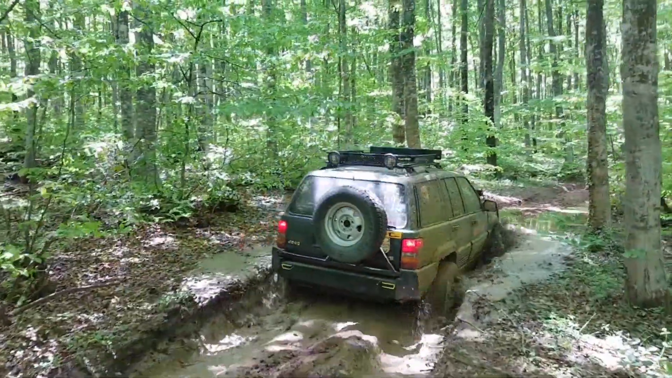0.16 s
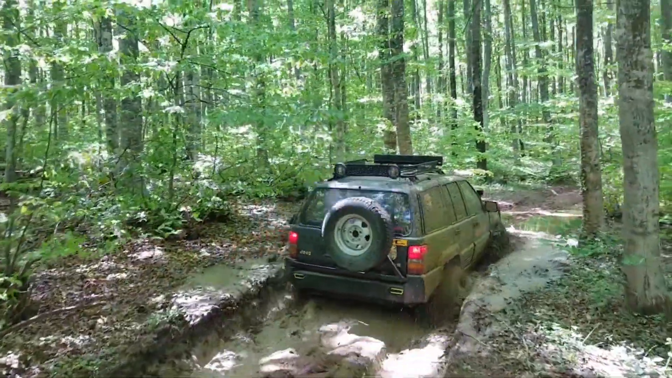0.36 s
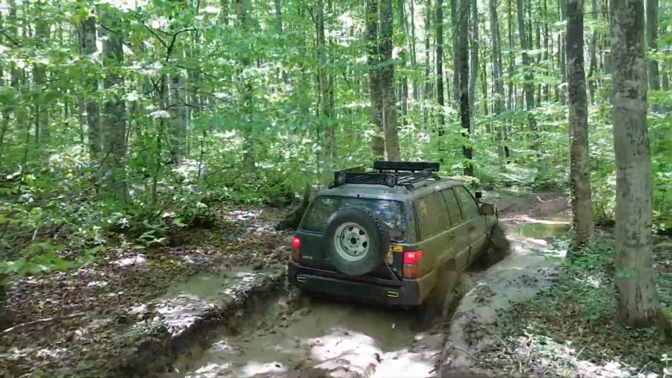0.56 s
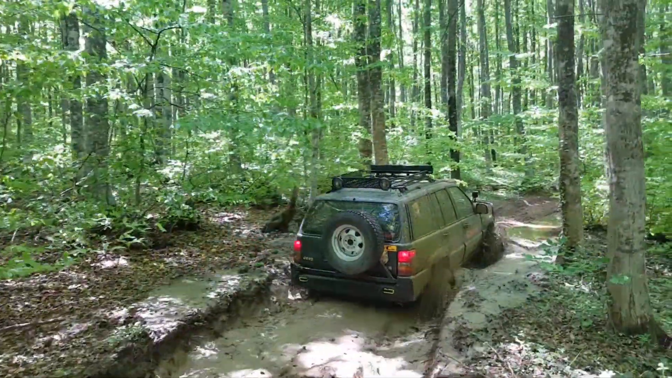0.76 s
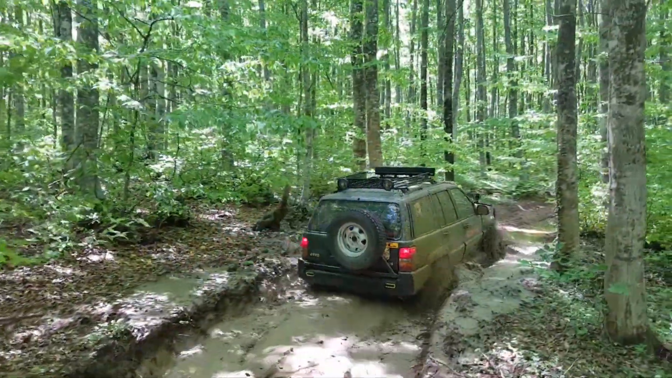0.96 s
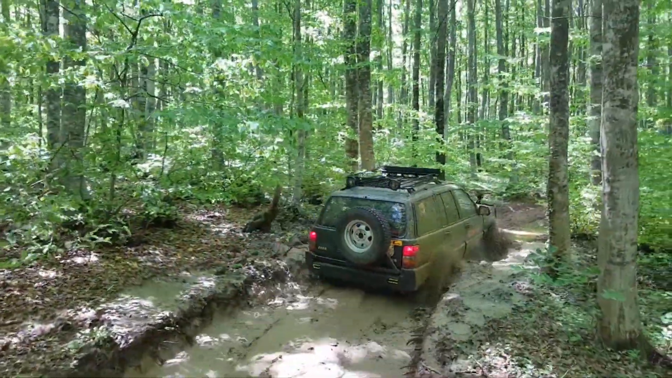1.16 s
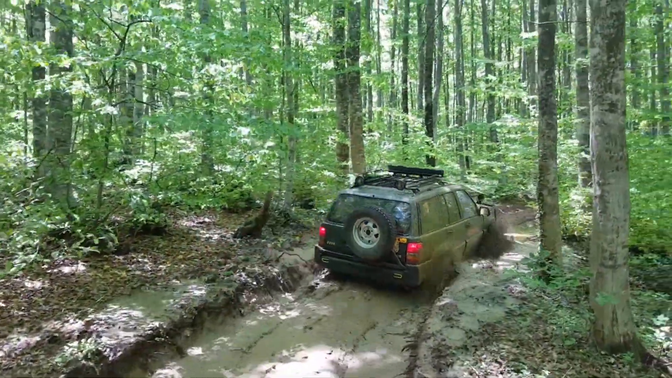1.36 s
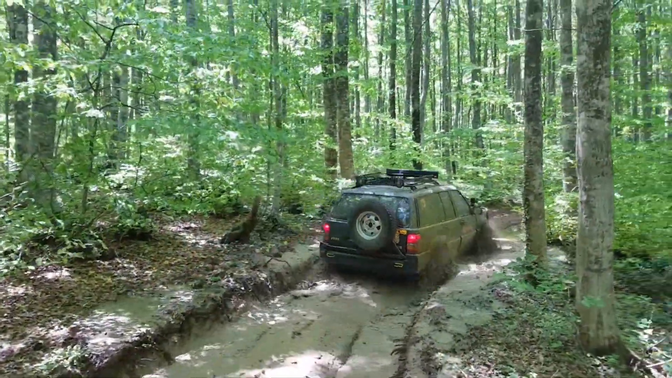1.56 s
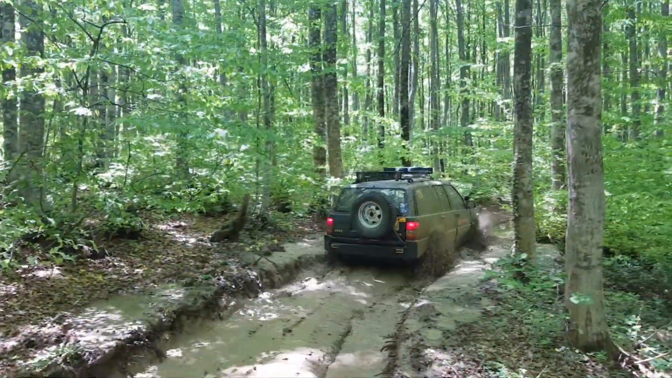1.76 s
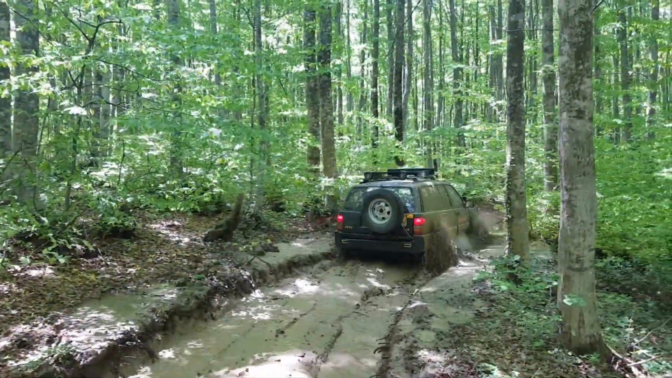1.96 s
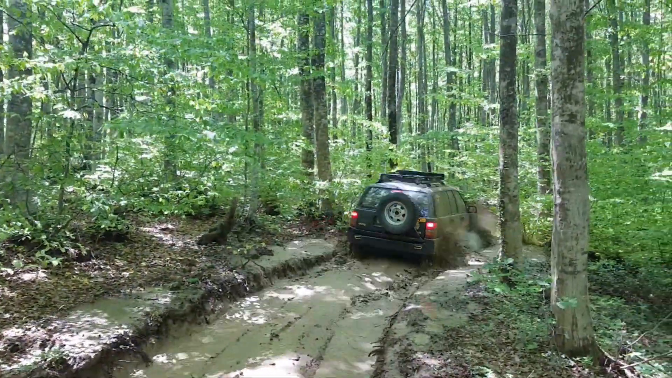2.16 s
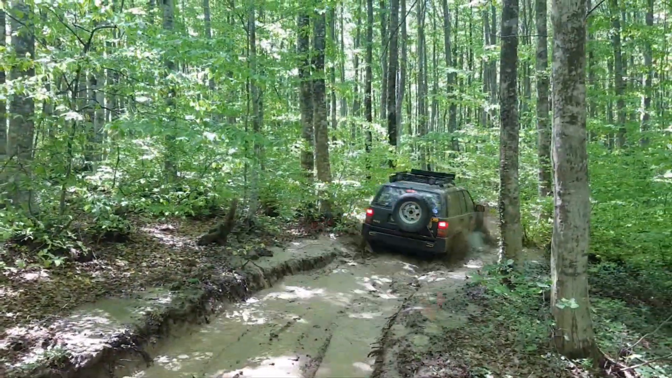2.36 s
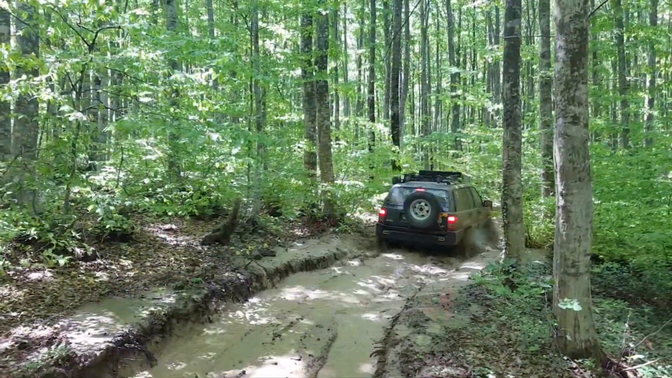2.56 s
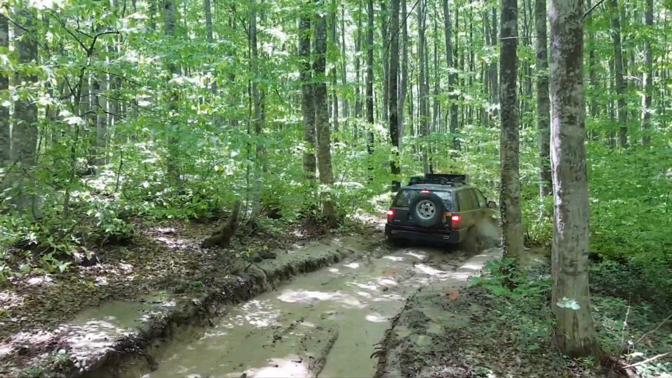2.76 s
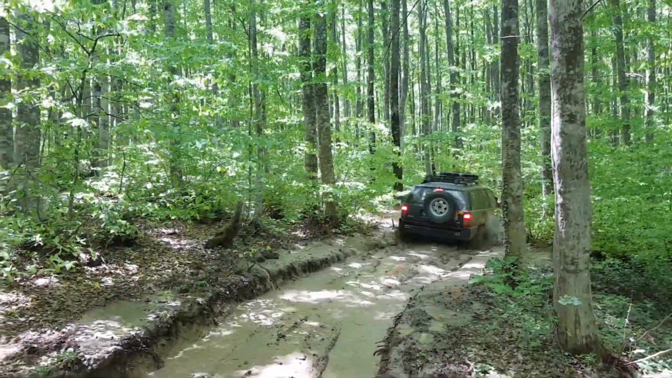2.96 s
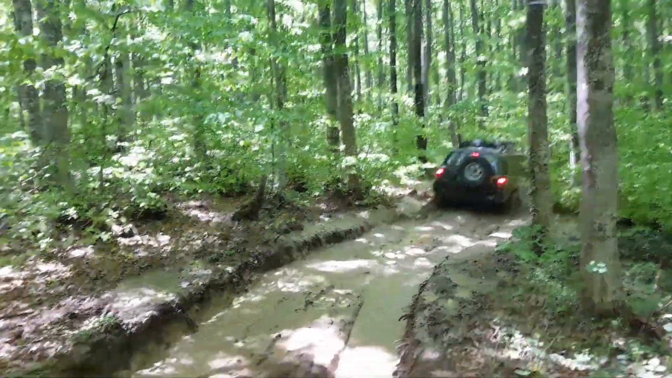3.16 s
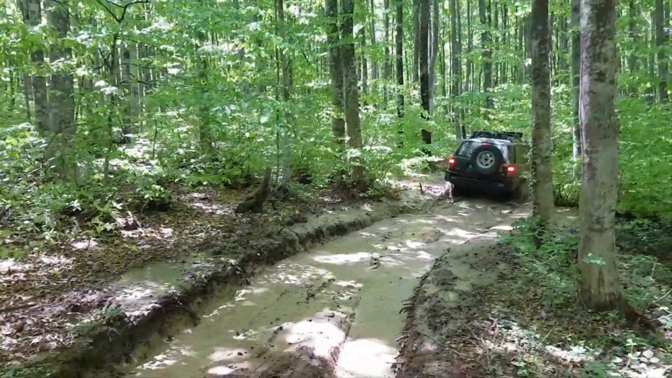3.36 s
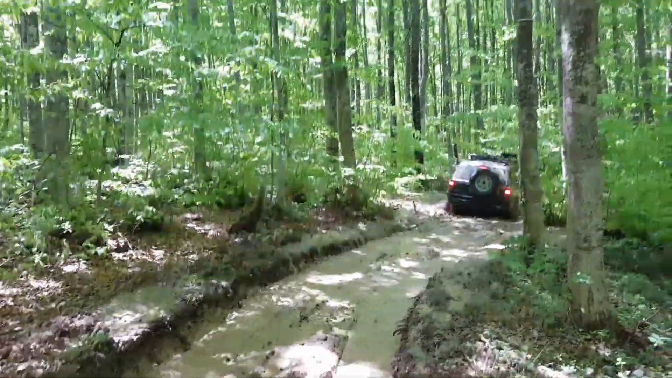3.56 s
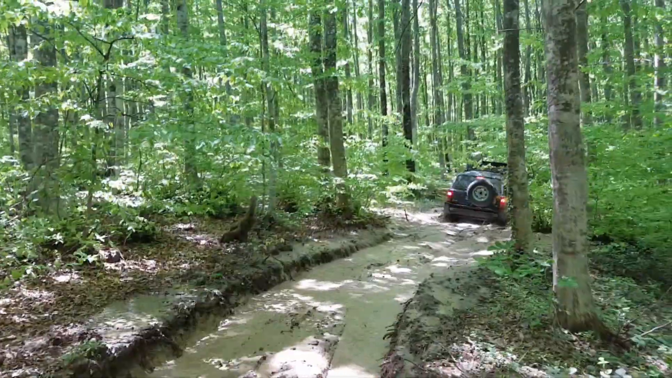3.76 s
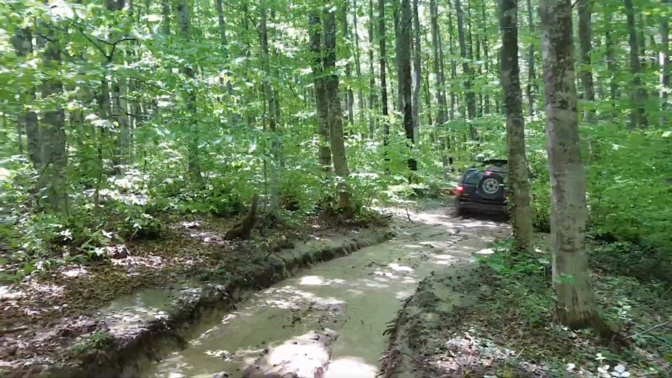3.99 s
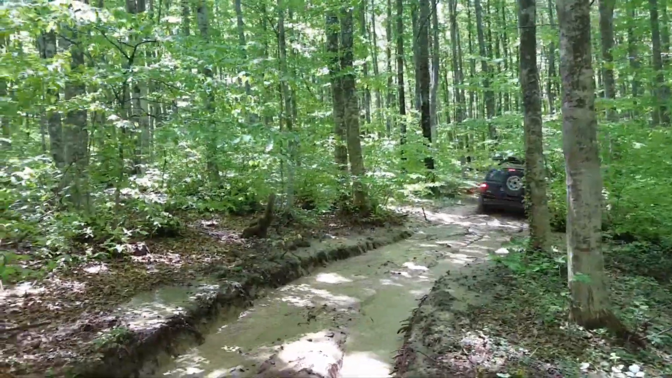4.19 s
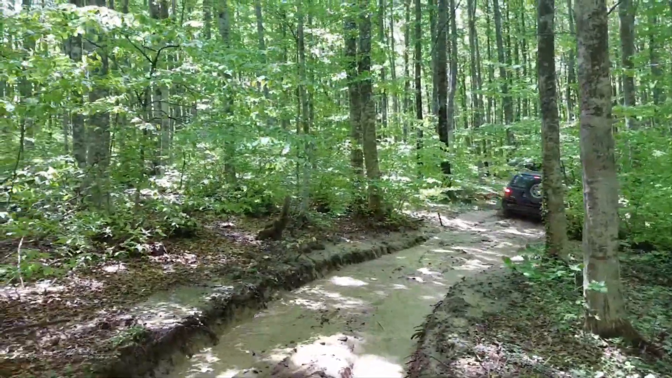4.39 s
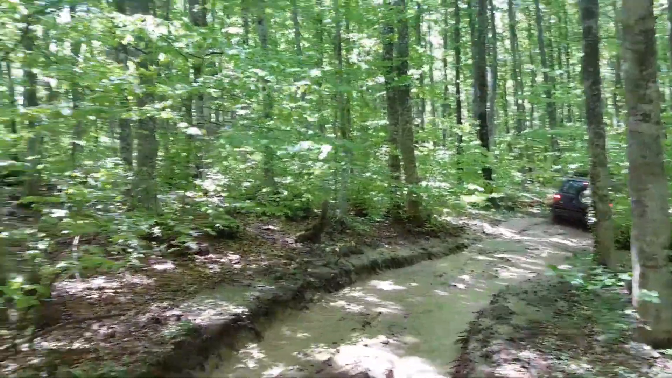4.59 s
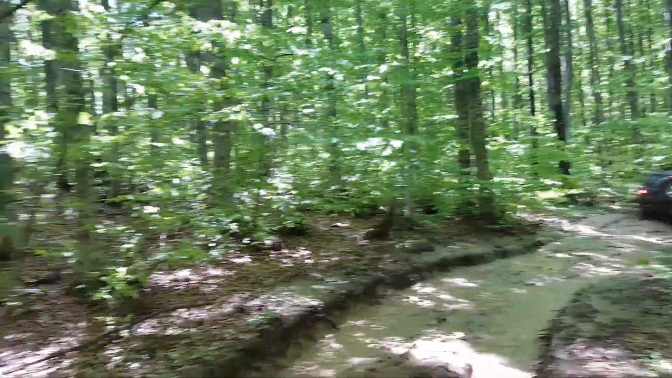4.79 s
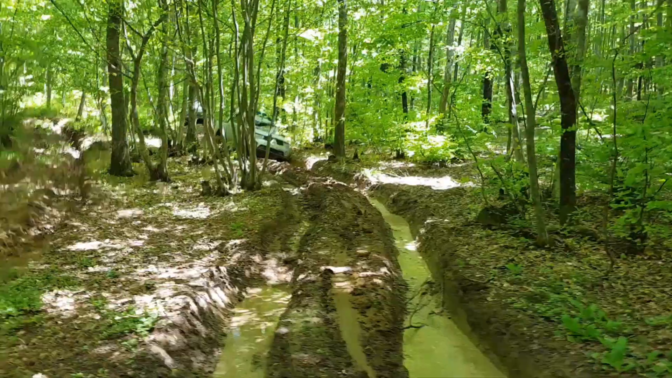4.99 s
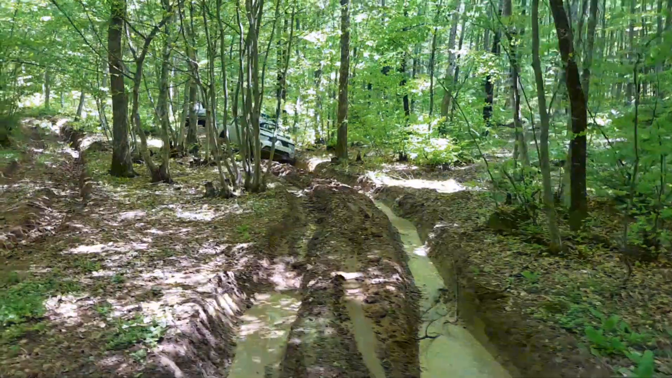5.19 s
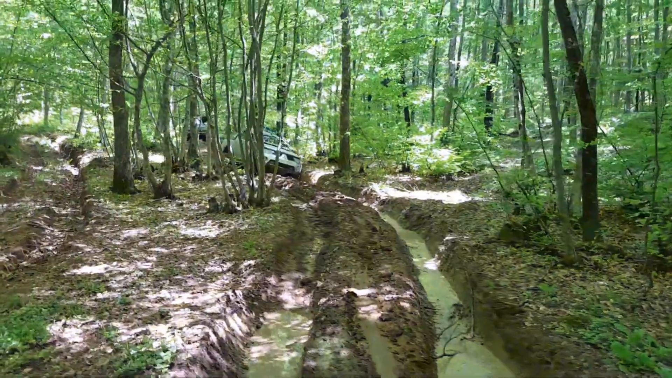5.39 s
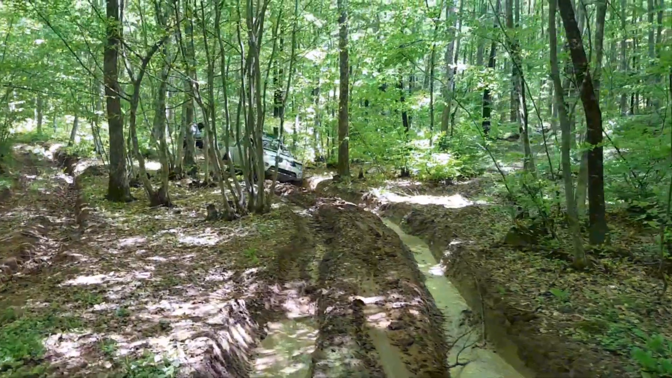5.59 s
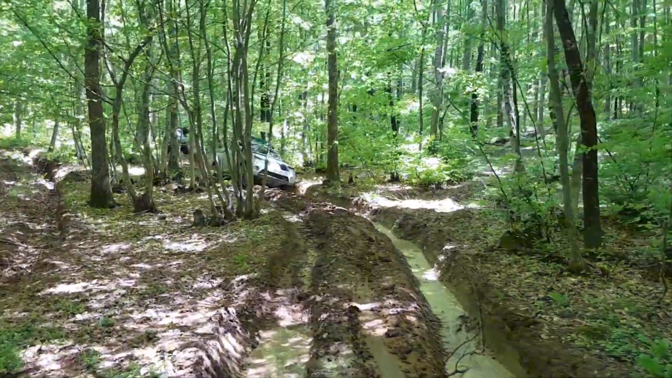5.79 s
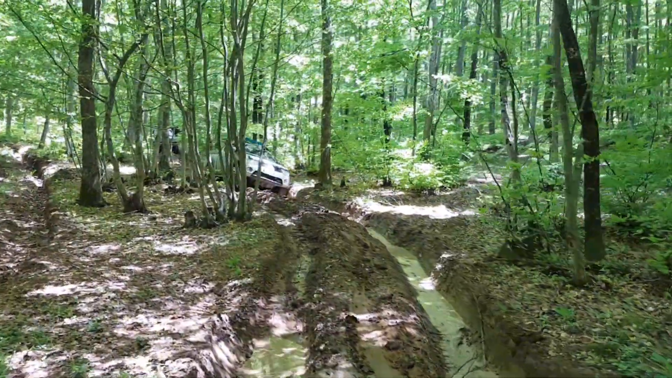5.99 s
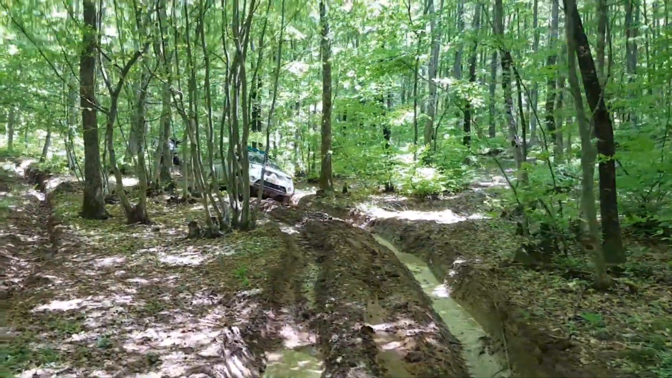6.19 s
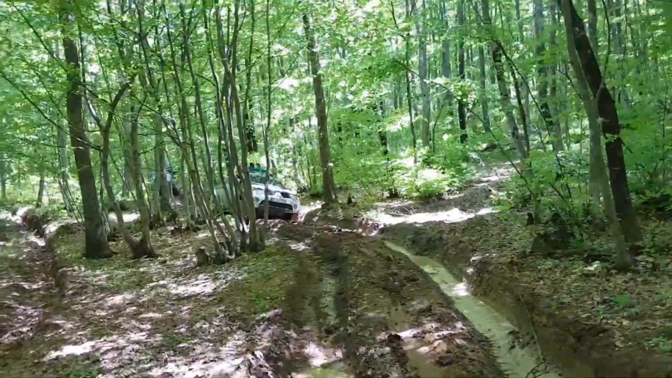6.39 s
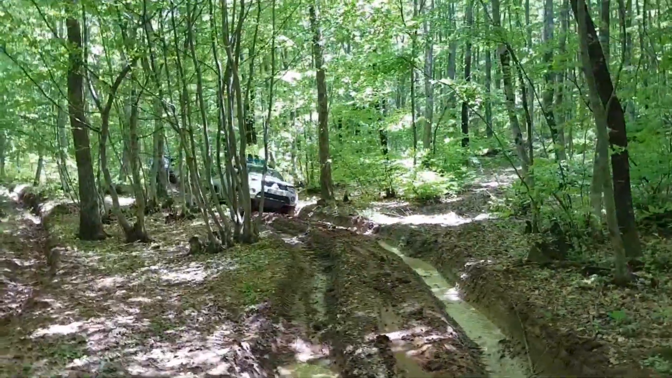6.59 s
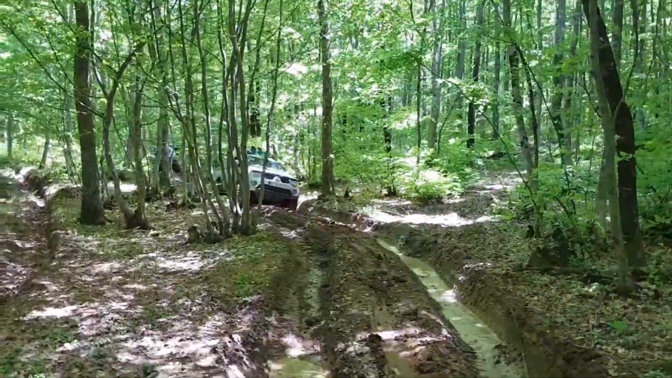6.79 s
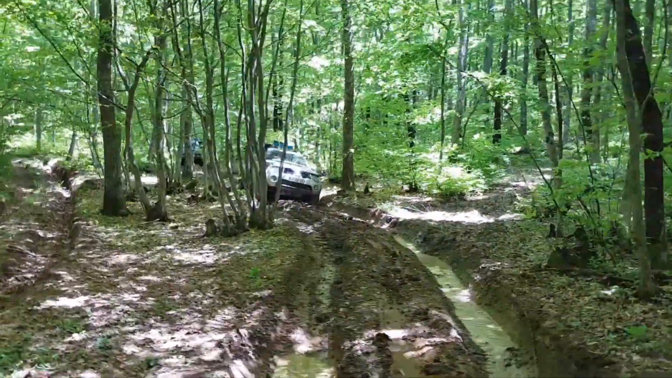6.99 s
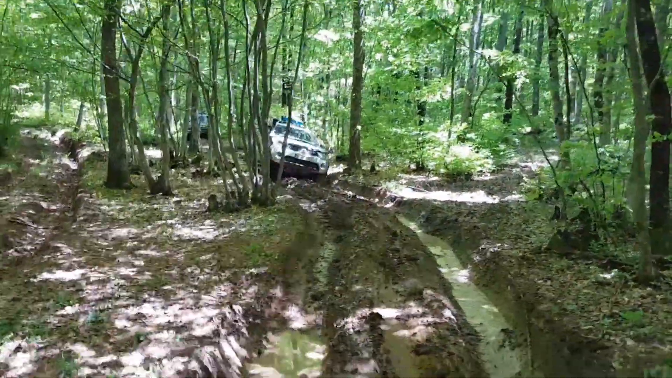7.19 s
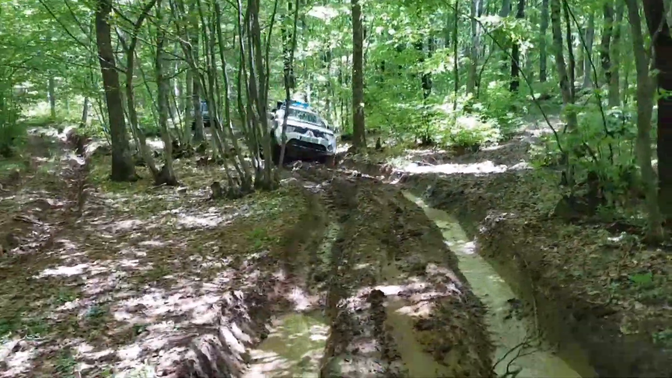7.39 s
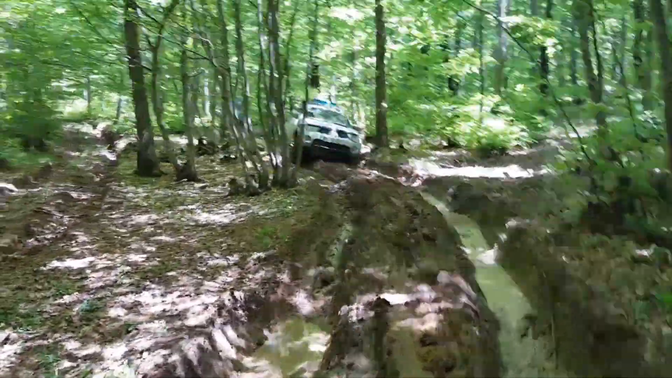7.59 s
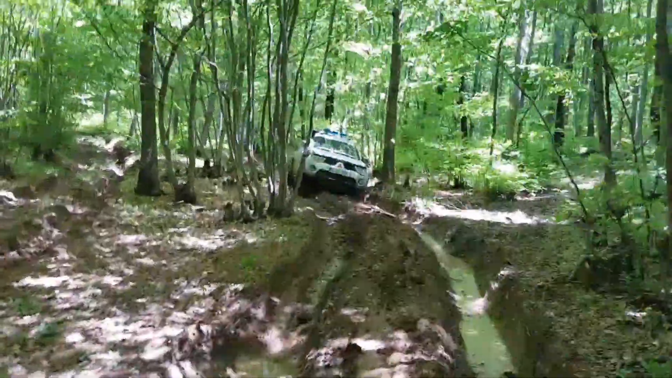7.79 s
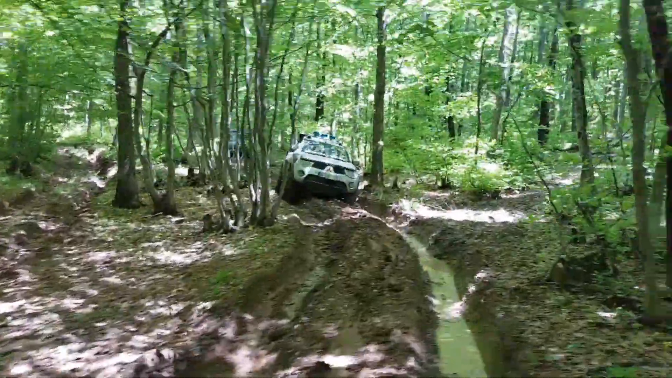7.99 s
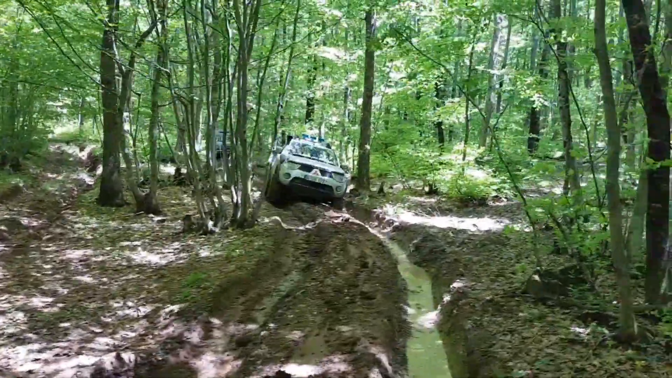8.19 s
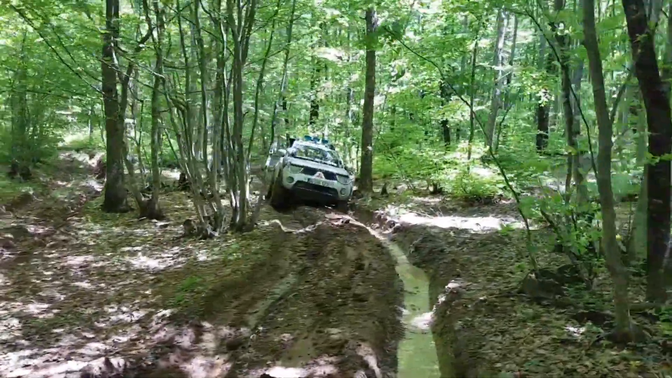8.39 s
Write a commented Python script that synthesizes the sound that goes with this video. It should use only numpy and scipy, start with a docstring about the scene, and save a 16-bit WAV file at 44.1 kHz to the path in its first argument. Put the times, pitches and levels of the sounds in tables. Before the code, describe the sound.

From 0 s a close eight-cylinder off-roader roars through a muddy rut, its lumpy exhaust growl climbing until about 1.7 s, with deep rumble, midrange roar and wide hiss. Around 2 s the pitch falls; by 2.8 s the throttle is off and a low, uneven burble recedes until 5 s. A faint wavering idle hums further away from 2 s onwards. At 5.05 s an abrupt cut brings quieter rumble and rushing noise. A diesel tone sinks until about 6.2 s, then rises and grows from 7.6 s to the end at about 8.4 s. Another engine behind revs once near 6.8 s. Twigs crack at 5.6, 6.2 and, in a cluster, 8.2 s; dull knocks come at 5.9, 6.3, around 7 and 8.1 s. Brief leaf rustles at 7.3, 7.7, 7.9 and 8.2 s lean left. Open forest, handheld stereo microphone, treble rolled off at the very top.

```python
"""An eight-cylinder off-roader revs through a muddy rut, then lifts off and drives away between the trees.
From about two seconds on, a hum idles further away. Just after five seconds the scene jumps in time:
a diesel off-roader creeps closer with dull knocks, and another engine revs once behind it.
Twigs snap and leaves rustle beside a two-port microphone. Engines are stacks of sine tones with shaped
noise for rumble, roar and hiss; snaps, rustles and knocks are short bursts of filtered noise."""
import sys
import numpy as np
from scipy import signal
from scipy.fft import rfft, irfft, next_fast_len
from scipy.io import wavfile
from scipy.ndimage import uniform_filter1d

SR = 44100
rng = np.random.default_rng(int(sys.argv[2]) if len(sys.argv) > 2 else 0)


def transcribe(u):
    """Save the signal u as a 16-bit wav file named by the first command-line argument.

    u: samples, shape (n,) or (channels, n), limited to [-1, 1]; the rate is SR.
    q: integer samples, one column per channel.
    """
    v = np.clip(np.atleast_2d(u).T, -1, 1)
    q = np.round(v * 32767).astype(np.int16)
    wavfile.write(sys.argv[1], SR, q)


N = 372644
TIME = np.arange(N) / SR


def gain_of(db):
    """Decibels turned into an amplitude factor."""
    return 10 ** (np.asarray(db) / 20)


def evened(x):
    """The same shape scaled to an rms of 1."""
    return x / np.sqrt(np.mean(x ** 2) + 1e-20)


def read(points, hz):
    """A curve of (frequency, value) points read at hz, straight between points on a log frequency scale."""
    f, value = np.transpose(points)
    return np.interp(np.log(hz + 1), np.log(f + 1), value)


def follow(rows, t):
    """The columns of a table, after its start_s column, read at times t."""
    s, *columns = np.transpose(rows)
    return [np.interp(t, s, column) for column in columns]


def add(mix, start_s, sound):
    """Lay a short stereo sound into the mix, cut off at the end of the mix."""
    part = mix[:, round(start_s * SR):][:, :sound.shape[1]]
    part += sound[:, :part.shape[1]]


def panned(x, pan_db):
    """Place a sound by level alone; pan_db is left minus right."""
    return x * gain_of([[pan_db / 2], [-pan_db / 2]])


def band(x, hz, spread):
    """A broad band from hz / spread to hz * spread."""
    edges = [hz / spread, min(hz * spread, SR / 2.5)]
    return signal.sosfilt(signal.butter(2, edges, "band", fs=SR, output="sos"), x)


def wander(hz):
    """Slow chance of rms 1: sines of random phase up to hz."""
    f = np.geomspace(hz / 20, hz, 16)[:, None]
    t = TIME[::128]  # slow enough to compute at every 128th sample
    waves = np.sin(2 * np.pi * (f * t + rng.random((16, 1)))) / f ** 0.26
    return np.interp(TIME, t, evened(waves.sum(0)))


def tone(turns, db, waver_db, slip, apart):
    """One exhaust multiple: uneven firing shakes level and phase (slip); the ports hear it slightly apart."""
    phase = 2 * np.pi * (turns + rng.random()) + slip * wander(14)
    skew = apart * wander(1.8)
    level = np.sqrt(2) * gain_of(db + waver_db * wander(16))
    return level * np.sin([phase + skew, phase - skew])


def leaving_engine():
    """Uneven exhaust spacing of the two banks lifts multiples 5, 11 and 13 beside the firing tone 8."""
    # the engine's course: start_s [s], engine cycles per second [Hz], base level_db of the exhaust [dB]
    course = [(0.0, 17.96, -7), (0.15, 18.82, -10), (0.5, 20.01, -7), (0.65, 20.63, -7.5),
              (0.92, 22.84, -6), (1.05, 23.46, -6.5), (1.2, 23.43, -6.5), (1.65, 24.18, -6.5),
              (1.93, 23.61, -8), (2.05, 22.48, -12.5), (2.2, 20.4, -15.5), (2.4, 17.63, -15),
              (2.55, 15.95, -20.5), (2.75, 14.1, -30.5), (3.1, 12.65, -34.6), (3.4, 12.3, -31.6),
              (3.7, 12.78, -31), (3.95, 12.1, -32), (4.3, 11.3, -36.5), (4.8, 10.56, -36.5),
              (5.06, 10.52, -37.5)]
    # strong multiples of the engine cycle
    strong_multiples = [5, 8, 11, 13, 16]
    # weaker ones: multiple, level_db against the strong ones together [dB]
    weak_multiples = [(3, -14.5), (6, -23), (7, -16), (9, -25.5), (10, -22), (12, -22.5), (14, -28.5),
                      (18, -35), (19, -30), (22, -33.5), (24, -30.5), (26, -32.5), (29, -36.5), (33, -35.5)]
    # what the exhaust pipe lets through: pitch_hz [Hz], level_db [dB]
    pipe = [(50.0, -24), (65.0, -18.5), (90.0, 0.8), (115.0, -2.5), (135.0, -1), (160.0, -8), (180.0, -7.5),
            (200.0, -17), (235.0, -14), (290.0, -17.5), (330.0, -23.5), (390.0, -27)]
    # added level of each strong multiple while pulling, and while coasting [dB]
    pulling_db = [-9.5, 0.5, -10, -2, -6.5]
    coasting_db = [8.5, -0.5, 4, 1.7, 8]
    # when the throttle starts and ends its lift [s, s]
    lift = (2.37, 2.77)
    # a tone dips for a moment, by multiple: middle_s [s], depth_db [dB], half_length_s [s]
    dips = {5: [(.93, -5.5, 0.078), (1.6, -4, 0.14)], 8: [(1.28, -4, .06), (1.78, -7.5, 0.064),
            (2.29, -10.5, 0.053), (4.7, -4, 0.33)], 11: [(.1, -5, .07), (2.4, -9, .14)],
            13: [(2.85, -12, 0.3)], 16: [(.9, -3, 0.21), (2.3, -5, 0.22), (3.12, -8, .1), (4.0, -5, .2)]}
    coast_weak_db, coast_waver_db = -2.5, 1.04  # coasting thins the weak multiples and shakes the strong ones

    rate, level_db = follow(course, TIME)
    turns = np.cumsum(rate) / SR
    lifted = np.interp(TIME, lift, [0, 1])

    levels = [level_db + read(pipe, k * rate) + pull_db + (coast_db - pull_db) * lifted
              for k, pull_db, coast_db in zip(strong_multiples, pulling_db, coasting_db)]
    # the strong multiples together, smoothed over 6000 samples
    load_db = 10 * np.log10(uniform_filter1d(sum(gain_of(db) ** 2 for db in levels), 6000))
    strong = 0
    for k, db in zip(strong_multiples, levels):
        dip_db = sum(depth_db * np.exp(-((TIME - s) / half) ** 2) for s, depth_db, half in dips[k])
        waver_db = .6 + coast_waver_db * lifted
        strong = strong + tone(k * turns, db + dip_db, waver_db, slip=.07, apart=.09)

    weak = 0
    for k, db in weak_multiples:
        # the microphone's bass falls off under 70 Hz: weak multiples lose 30 dB per octave
        thin_db = 30 * np.minimum(np.log2(k * rate / 70), 0)
        weak_db = db + load_db + thin_db + coast_weak_db * lifted
        weak = weak + tone(k * turns, weak_db, waver_db=1.5, slip=0.037 + 0.034 * k, apart=0.051)

    rumble, roar = leaving_noise()
    # every firing puffs the roar, one bank harder than the other
    firing = np.cos(2 * np.pi * strong_multiples[1] * turns)
    bank = np.cos(2 * np.pi * strong_multiples[0] * turns)
    puffs = 1 + .14 * firing + .07 * bank
    return strong + weak + rumble + roar * evened(puffs)


def leaving_noise():
    """Rumble and roar of the leaving car; ground echo colours the roar and its dips move as the car moves."""
    # how near the car sounds: start_s [s], level_db [dB]
    reach = [(0, -.5), (.9, -1), (1.6, 0.5), (2.3, -1.5), (3.8, -8.5), (4.3, -10), (5.05, -12.5)]
    # exhaust rumble, engine roar, fan and mud hiss: level_db at reach 0 [dB], share of the reach followed
    layers = ([(-29.5, 0.88), (-30, 1.11), (-36, 0.97)])
    # roar colour, first and last: pitch_hz [Hz], relative level_db [dB]
    roars = ([(210, -23), (350, -16), (377, -5.5), (466, -4), (541, -1), (769, -3), (875, -11), (1210, -6),
              (1510, -11.5), (2170, -16.5), (2490, -14.5), (3200, -27), (4160, -43), (7040, -120)],
              [(210, -38), (350, -29.5), (402, -4), (639, 2), (769, -5), (1020, -4.5), (1280, -8.5),
              (1480, -8.5), (1820, -11.5), (2500, -12.5), (3200, -22), (4160, -51), (7040, -120)])
    # when the roar colour starts and ends its change [s, s]
    turn = ((1.1, 2))
    # hiss colour: pitch_hz [Hz], relative level_db [dB]
    hiss = ([(1760, -10), (3000, -6), (5260, -10.5), (6690, -11), (7720, -15), (8860, -25.5),
             (14000, -24.5), (15400, -34)])
    # left-right likeness of the noise: pitch_hz [Hz], likeness [0 to 1]
    same = [(170, .98), (350, .96), (690, .92), (950, .72), (1300, .62), (1700, .33), (3400, .28),
            (5200, .05)]
    return car_noise(reach, layers, roars, turn, hiss, same, swell_db=0.44, dull=0.55)


def car_noise(reach, layers, roars, turn, hiss, same, swell_db, dull):
    """Rumble, and roar with hiss, as random short-time spectra; the top treble fades fastest with distance."""
    # spectral shape of the rumble: pitch_hz [Hz], relative level_db [dB]
    rumble_shape = [(20, -30), (40, 1), (80, 3), (130, 14.5), (220, 10), (320, 2), (420, -5.5),
                    (600, -31.5)]
    frames, hz = N // 256 + 5, np.fft.rfftfreq(1024, 1 / SR)
    t = np.arange(frames) * 256 / SR
    reach_db = follow(reach, t)[0]
    low_db, mid_db, high_db = (db + share * reach_db for db, share in layers)
    a, b, c, d, patches = rng.standard_normal((frames, 513, 5)).T
    # smoothed over frequency and time, the noise has louder and softer patches
    patches = evened(uniform_filter1d(uniform_filter1d(patches, 10, 0), 10, 1))
    swell = evened(uniform_filter1d(rng.standard_normal(frames), 6))
    shapes = (rumble_shape, *roars, hiss)
    low, first, last, high = (evened(gain_of(read(shape, hz)))[:, None] for shape in shapes)

    moved = np.interp(t, turn, [0, 1])
    roar = first ** (1 - moved) * last ** moved * gain_of(mid_db)
    air_db = dull * np.clip(hz / 8000 - 1, 0, 1)[:, None] * (high_db - high_db.max())
    fan = high * gain_of(high_db + air_db + swell_db * swell)

    # the right port shares part of the left port's noise and adds its own
    like = read(same, hz)[:, None]
    left, other = a + 1j * b, c + 1j * d
    right = like * left + np.sqrt(1 - like ** 2) * other
    spectra = np.array([left, right]) * gain_of(patches)

    def sound_of(spectrum):
        """Overlapping short spectra turned back into a waveform."""
        return signal.istft(spectrum, nperseg=1024, noverlap=768)[1]

    unit = sound_of(left).std()
    sizes = low * gain_of(low_db), np.hypot(roar, fan)
    return [sound_of(spectra * size)[:, :N] / unit for size in sizes]


def far_engine(rows, orders, waver_db, slip):
    """A distant exhaust: a few multiples of one tone, blurred by the trees, fading at the ends of its table."""
    hz, level_db = follow(rows, TIME)
    turns = np.cumsum(hz) / SR
    first_s, last_s = rows[0][0], rows[-1][0]
    fade = np.interp(TIME, [first_s - .05, first_s, last_s, last_s + .1], [0, 1, 1, 0])
    return fade * sum(tone(k * turns, level_db + db, waver_db, slip, apart=0.14) for k, db in orders)


def coming_engine():
    """The diesel that creeps closer: its exhaust tone sinks, then rises and grows louder."""
    # start_s [s], pitch_hz of the strongest exhaust tone [Hz], base level_db [dB]
    course = [(5.04, 128.6, -42.7), (5.3, 122.85, -40), (5.9, 115.1, -43.6), (6.2, 113.8, -44.2),
              (7.6, 116, -44.8), (7.9, 128, -37), (8.1, 134.5, -35.5), (8.45, 134.3, -35)]
    # multiple of that tone, level_db against the base level [dB]
    orders = [(.75, -5.5), (1, 0), (1.5, -15.5), (1.75, -24), (2, -16)]
    return far_engine(course, orders, waver_db=1.8, slip=.2)


def coming_noise():
    """Rumble, roar and hiss after the jump; the roar's echo dips move as the coming car moves."""
    # how near the car sounds: start_s [s], level_db [dB]
    reach = [(5.1, -5.5), (5.8, -7), (7.07, -3), (7.95, -2.5), (8.3, 1), (8.45, -1)]
    # exhaust rumble, engine roar, fan and mud hiss: level_db at reach 0 [dB], share of the reach followed
    layers = ([(-42.5, .05), (-41, .45), (-47.5, 0.95)])
    # roar colour, first and last: pitch_hz [Hz], relative level_db [dB]
    roars = ([(210, -35), (350, -20), (377, -4), (410, -11), (588, 2), (844, -7.5), (1020, -7), (1800, -16),
              (2230, -15), (3200, -24), (4160, -51), (7040, -120)], [(210, -37), (350, -14), (458, -11),
              (582, -8), (682, 0.5), (1120, -14.5), (1320, -7), (1430, -20), (1550, -12.5), (3200, -19.5),
              (4160, -46), (7040, -120)])
    # when the roar colour starts and ends its change [s, s]
    turn = ((7.3, 8.1))
    # hiss colour: pitch_hz [Hz], relative level_db [dB]
    hiss = ([(1760, -9), (3000, -4), (6690, -11), (8980, -28.5), (11300, -28), (12400, -33), (13700, -57),
             (15400, -62)])
    # left-right likeness of the noise: pitch_hz [Hz], likeness [0 to 1]
    same = [(60, 1), (240, 0.89), (950, 0.73), (3770, 0.046), (15000, 0.02)]
    return sum(car_noise(reach, layers, roars, turn, hiss, same, swell_db=0.5, dull=.1))


def knocks():
    """Chassis parts of the coming car knock: a short noisy ring with a soft start."""
    # start_s [s], peak_db before panning [dB], pitch_hz of the band centre [Hz]
    knock_rows = [(5.909, -42, 1384), (6.275, -36, 1100), (6.944, -33.5, 1100), (7.046, -39, 1112),
                  (7.105, -38, 1080), (8.08, -39, 2500), (8.155, -37, 1810)]
    out, t = np.zeros((2, N)), np.arange(1500) / SR
    for s, db, hz in knock_rows:
        noise = rng.standard_normal(1500)
        ring = band(noise * t * np.exp(-t / .005), hz, spread=1.15)
        add(out, s, panned(gain_of(db) * ring / abs(ring).max(), -5.0))
    return out


def engine_behind():
    """Another exhaust behind the coming car, whose pitch climbs in a rev and falls back."""
    # start_s [s], pitch_hz of the strongest exhaust tone [Hz], base level_db [dB]
    course = [(5.04, 146, -43.2), (5.35, 153, -46), (6.1, 134.8, -43.5), (6.4, 135.3, -46.6),
              (6.6, 142.6, -40.7), (6.8, 157, -39.9), (7.1, 141.8, -42.5), (7.3, 136.8, -43.7),
              (7.7, 134.6, -45.7)]
    # multiple of that tone, level_db against the base level [dB]
    orders = [(1, 0), (1.25, -15), (2, -12.5)]
    return far_engine(course, orders, waver_db=1.8, slip=.2)


def twig_snaps():
    """Short cracks of noise with a faint bright edge and a woody body."""
    # start_s [s], peak_db before panning [dB], pitch_hz of the band centre [Hz],
    # pan_db left minus right [dB], band spread [factor]
    snap_rows = [(5.572, -31, 2880, -2, 1.27), (5.676, -27, 3680, -4, 1.56), (5.6855, -40, 5000, -2.5, 2),
                 (6.232, -36, 3100, -1, 2), (8.21, -33, 4150, -12, 1.1), (8.213, -30, 4240, -6, 1.07),
                 (8.258, -31, 4800, -3, 1.2), (8.262, -25, 4850, -8, 1.44), (8.274, -27, 3470, -11, 1.7)]
    out, t = np.zeros((2, N)), np.arange(600) / SR
    for s, db, hz, pan_db, spread in snap_rows:
        noise = rng.standard_normal(600)
        # a click, then noise that dies away fast with a slower tail
        burst = 2 * (t == 0) + noise * (np.exp(-t / .0016) + .15 * np.exp(-t / .006))
        # crack, bright edge and woody body are each filtered from the same burst
        crack = evened(band(burst, hz, spread))
        edge = evened(band(burst, 9000, spread=1.5))
        body = evened(band(burst, 2400, spread=1.8))
        snap = crack + 0.16 * edge + 0.32 * body
        add(out, s, panned(gain_of(db) * snap / abs(snap).max(), pan_db))
    return out


def leaf_rustles():
    """Dense clumps of tiny cracks: noise of uneven level, faded at both ends."""
    # start_s [s], length_s [s], level_db before fading and panning [dB],
    # pitch_hz of the band centre [Hz], pan_db left minus right [dB]
    rustle_rows = [(7.33, 0.057, -57, 5050, -11), (7.69, 0.043, -43.5, 3600, -6),
                   (7.718, 0.063, -43, 4200, -10), (7.897, .05, -47.5, 3700, -10),
                   (8.212, 0.027, -52, 4200, -9)]
    out = np.zeros((2, N))
    for s, length, db, hz, pan_db in rustle_rows:
        n = round(length * SR)
        clumps_db = 3.5 * evened(uniform_filter1d(rng.standard_normal(n), 60))
        grains = rng.standard_normal((2, n)) * gain_of(clumps_db)
        grains = band(grains, hz, spread=1.5) + 0.16 * band(grains, 10560, spread=1.1)
        add(out, s, panned(gain_of(db) * evened(grains) * signal.windows.tukey(n, .55), pan_db))
    return out


def idling_engine():
    """The hum further away: a low exhaust tone and its multiples, strongly wavering."""
    # start_s [s], pitch_hz of the base tone [Hz], base level_db [dB]
    course = [(1.9, 41.6, -51), (3.3, 41.5, -58), (3.9, 39, -62), (4.3, 40, -52), (5, 39, -49.5),
              (5.1, 38.8, -60), (6, 38.3, -62), (6.5, 38.1, -58.5), (8.45, 38.6, -53.5)]
    # multiple of that tone, level_db against the base level [dB]
    orders = [(1, 0.5), (2, 2.5), (6, -0.5), (7, -2.5)]
    return far_engine(course, orders, waver_db=4.0, slip=0.33)


def ports(x, lean, lead):
    """Each microphone port hears its own level and phase, which differ with pitch."""
    size = next_fast_len(N)
    hz = np.fft.rfftfreq(size, 1 / SR)
    port = gain_of(read(lean, hz) / 2) * np.exp(.5j * read(lead, hz))
    return irfft(rfft(x, size) * np.array([port, 1 / port]), size)[:, :N]


def scene():
    """The leaving car gives way to the coming one at the jump; the idling hum runs through it."""
    # port level difference for the leaving car, and for the far engines: pitch_hz [Hz], left minus right [dB]
    near_lean = [(60, .6), (130, -.6), (290, -1), (640, -1), (1400, -.4), (3000, -3.3), (6000, -7.5),
                 (8300, -2.5), (11000, -.8)]
    far_lean = [(60, 0.5), (150, 0.0), (380, -1.0), (950, -2.0), (2380, -5.0), (5970, -8.0), (15000, -1.0)]
    # port phase difference, likewise: pitch_hz [Hz], how far left leads [radians]
    near_lead = [(170, -.3), (350, -.1), (1300, -.15), (2400, -1.3), (3400, -2)]
    far_lead = [(260, -.3), (600, -.1), (1300, .3), (2400, 0)]
    jump_s, blend_s = 5.052, .012
    after_share = np.clip((TIME - jump_s) / blend_s + .5, 0, 1)

    before = ports(leaving_engine() * np.sqrt(1 - after_share), near_lean, near_lead)
    arrivals = coming_noise() + coming_engine() + engine_behind()
    after = ports(arrivals * np.sqrt(after_share) + idling_engine(), far_lean, far_lead)
    return before + after + twig_snaps() + leaf_rustles() + knocks()


def record(dry):
    """The microphone's band limit: a steep filter removes what lies above 15600 Hz."""
    lowpass = signal.firwin(511, 15600, window=("kaiser", 9), fs=SR)
    return signal.oaconvolve(dry, lowpass[None], "same")


dry = scene()
out = record(dry)
transcribe(out)
```